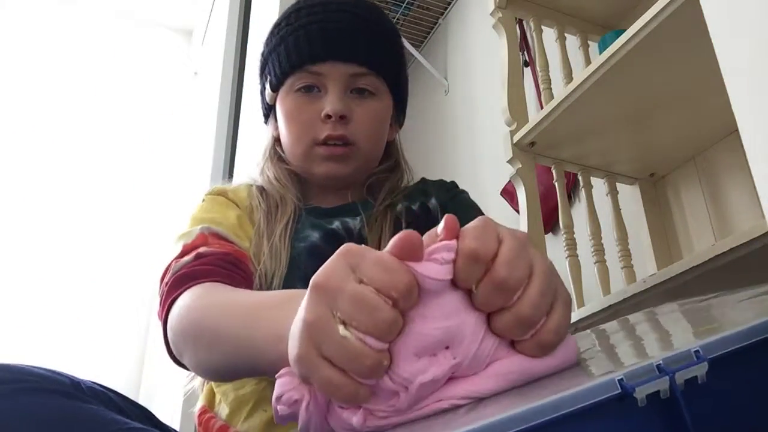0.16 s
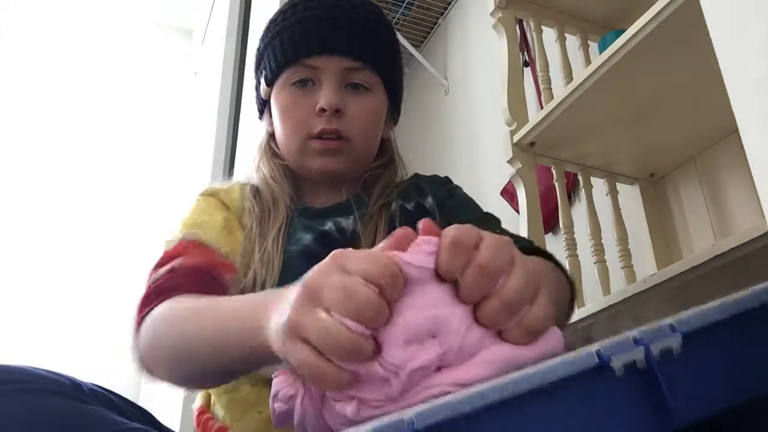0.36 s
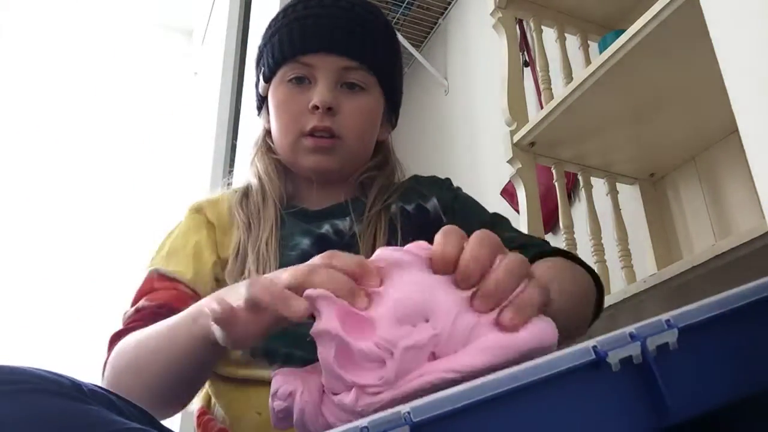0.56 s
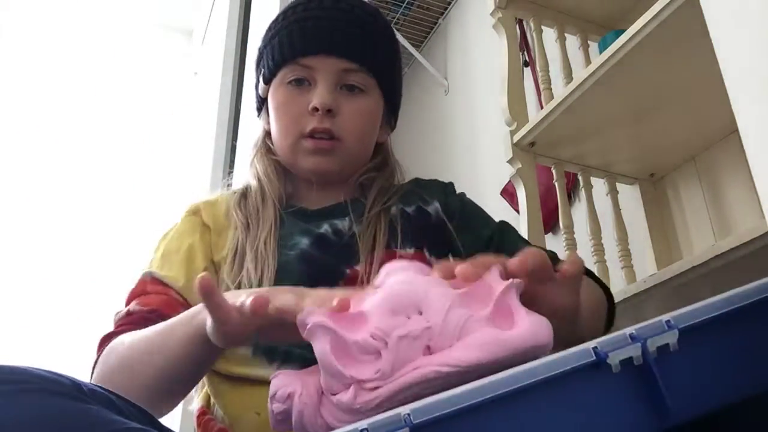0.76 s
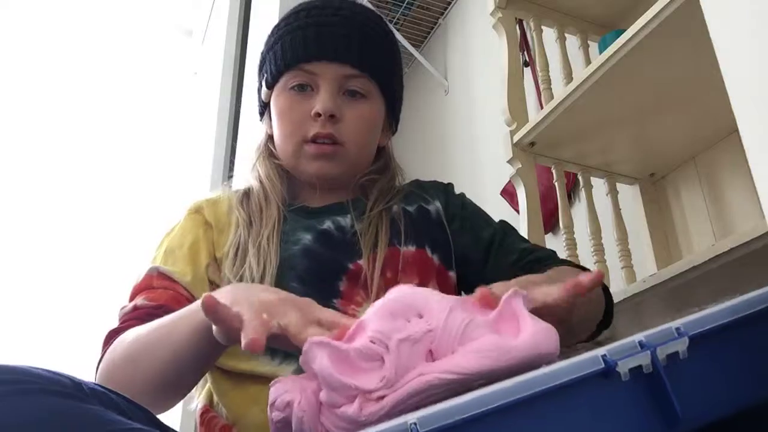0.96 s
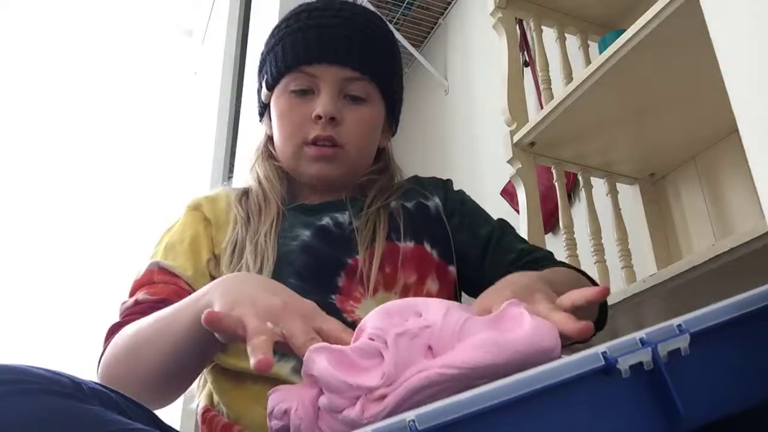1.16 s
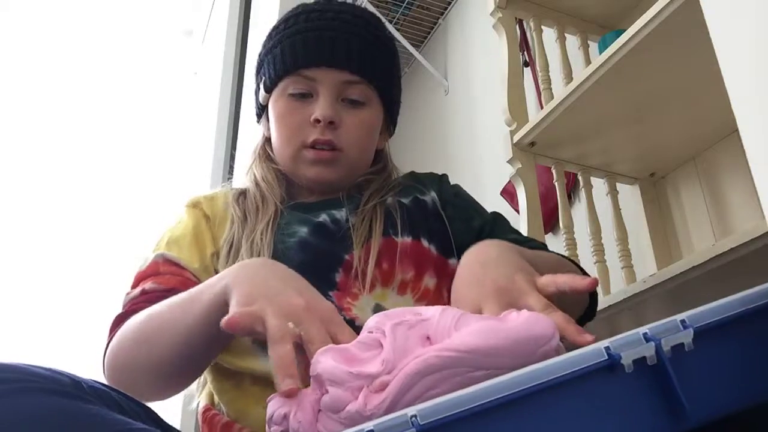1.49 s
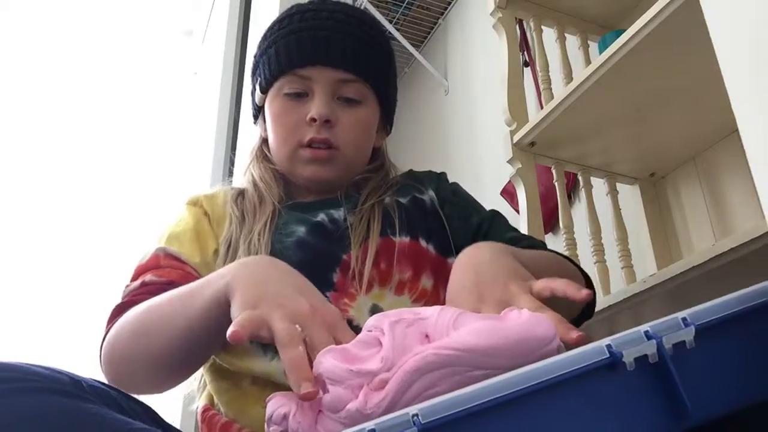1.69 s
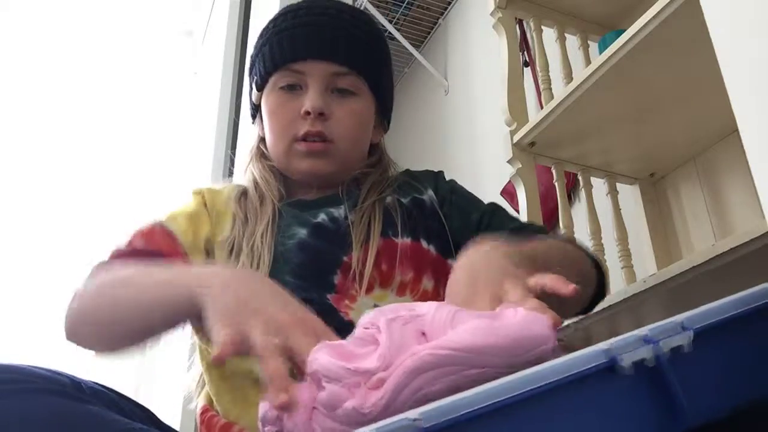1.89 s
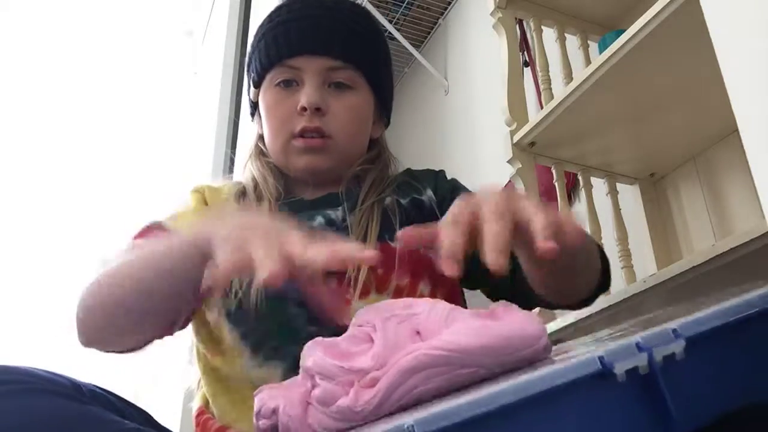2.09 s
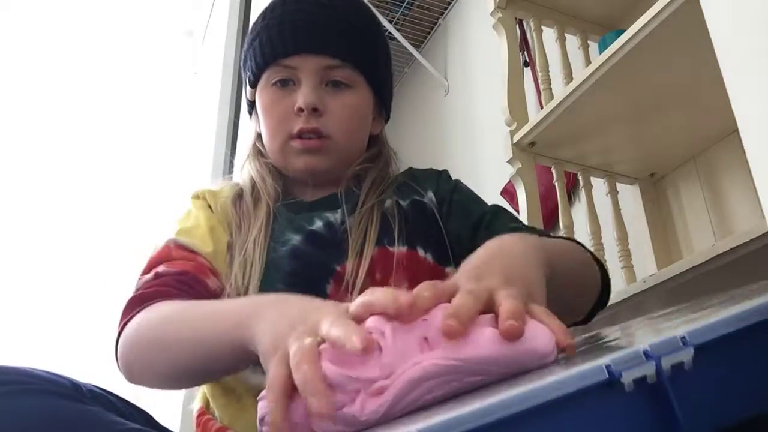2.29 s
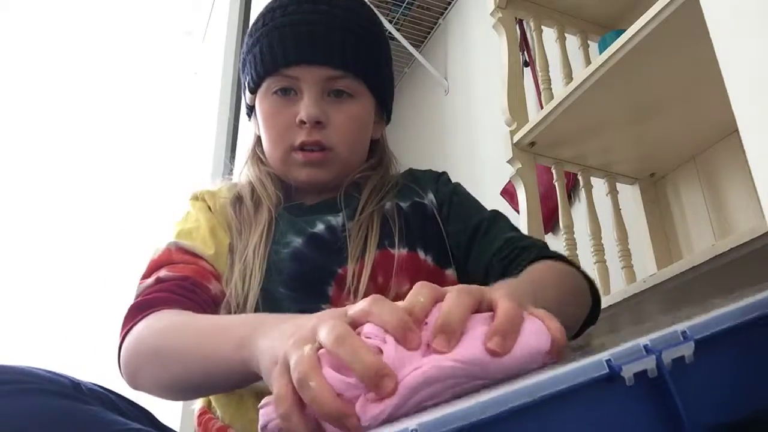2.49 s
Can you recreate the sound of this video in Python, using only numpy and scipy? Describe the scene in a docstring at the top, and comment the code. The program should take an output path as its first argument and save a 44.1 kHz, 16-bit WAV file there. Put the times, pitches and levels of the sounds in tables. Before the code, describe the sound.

Soft slime is kneaded by hand, close to the microphone in a small room. Tiny bubbles snap first, then air pockets plop among wet squishes. Near the end a plastic lid rumbles softly, over a steady low hum.

```python
"""Kneading slime on a plastic lid

Two hands work soft slime, close up in a small room. Tiny surface bubbles snap, trapped air plops
out among wet smacks and squishes, and the sticky skin peels away with a fine crackle.
Toward the end the lid rumbles as the hands lift and press down again; an appliance hums behind."""
import sys
import numpy as np
from scipy import signal
from scipy.fft import rfft, irfft, next_fast_len
from scipy.io import wavfile

SR = 44100
rng = np.random.default_rng(int(sys.argv[2]) if len(sys.argv) > 2 else 0)


def inscribe(sig):
    """Save sig as 16-bit PCM at rate SR to the path in sys.argv[1].

    A 1-D sig is mono; a 2-D sig holds one channel per row.
    Samples are clipped to [-1, 1] before scaling.
    """
    pcm = np.round(np.clip(np.atleast_2d(sig).T, -1, 1) * 32767)
    wavfile.write(sys.argv[1], SR, pcm.astype(np.int16))


N = 116865


def snaps():
    """A bubble film bursts: a few very high cycles over a small dull push."""
    # surface bubbles: (time [s], level before EQ [dB], pitch [Hz], push against ring [dB])
    bubbles = [(.0057, -43.5, 11700, -30), (.0849, -44, 10700, -28), (0.092, -40, 12800, -31.5),
               (0.108, -47, 11000, -30), (0.1225, -32, 13300, -38), (0.15, -8.5, 13320, -13.5),
               (.1632, -28, 12400, -25), (0.1838, -27.5, 12400, -34), (0.253, -53, 11100, -6.5),
               (.299, -52.5, 9700, 3), (.3412, -41, 14000, -1.5), (0.348, -24, 11550, -31),
               (0.5588, -60, 7840, 16), (.585, -62, 8000, 3), (.8761, -62, 14000, -16),
               (0.8914, -35.5, 11800, -8), (1.2205, -48.5, 13100, -20.5), (1.264, -43, 13600, 0),
               (1.3095, -53, 11700, -20), (1.504, -57.5, 8500, 13.5), (1.5432, -45, 8800, -32),
               (1.687, -59.5, 10000, -20), (1.699, -57.5, 5400, 13), (2.1328, -49.5, 5500, -12),
               (2.5666, -55.5, 6850, -15), (2.5751, -51, 13500, -3), (2.5894, -68, 8800, 2)]
    # EQ on the snaps: (frequency [Hz], gain [dB])
    colour = [(1200, 3.5), (2050, -3.5), (3100, 4.5), (4200, -2), (5300, 3), (7000, 0), (8500, 1.5),
              (12000, -3), (14500, 0), (16000, -4)]
    push_hz, low_cut_hz = 1500, 750
    out, t = np.zeros(N), np.arange(SR // 100) / SR
    for s, db, hz, push_db in bubbles:
        ring = np.sin(2 * np.pi * hz * t) * swell(t, rise=.00013, t60=.00045)
        push = np.cos(2 * np.pi * push_hz * t) * fade(t, t60=.0001)
        add(out, s, amp(db) * (ring + amp(push_db) * push))
    return filtered(out, lambda f: amp(along(colour, f)) * 1j * f / (1j * f + low_cut_hz))


def plops():
    """An air pocket rings briefly, its pitch sagging as the slime closes over it."""
    # pockets squeezed out:
    # (time [s], level [dB], starting pitch [Hz], t60 [s], sag [share of pitch], overtone [dB])
    pockets = [(.2705, -37.5, 436, 0.036, 0.43, -12.5), (.278, -43, 259, 0.044, 0.064, -20),
               (0.5256, -33, 319, .036, .25, -17.5), (.58, -51, 360, .033, 0.09, -13),
               (.638, -48, 354, 0.073, 0.062, -18), (.745, -52, 391, 0.042, .1, -12),
               (1.029, -40, 189, 0.018, 0.061, -6), (1.076, -37, 174.4, 0.047, .05, -11),
               (1.085, -40.5, 452, 0.03, 0.17, -19.5), (1.4406, -28.5, 190, 0.021, 0.12, -13),
               (1.4496, -29, 380, 0.032, .3, -33), (1.4505, -41.5, 652, 0.027, .15, -23),
               (1.522, -55, 403, 0.022, .1, -12), (1.6515, -40, 615, 0.013, 0.11, -7),
               (1.652, -25, 214, 0.044, 0.083, -4.5), (2.101, -36.5, 246, 0.057, .1, -20),
               (2.107, -30.5, 554, 0.048, 0.068, -30), (2.109, -26, 381, 0.02, 0.24, -34),
               (2.1323, -35, 670, 0.0083, 0.25, -14), (2.182, -33.5, 222, 0.034, 0.05, -11),
               (2.314, -32.5, 199, 0.025, 0.13, -10), (2.386, -35, 210.5, 0.034, .15, -4.5),
               (2.405, -40, 452, 0.033, 0.23, -24), (2.604, -54, 400, 0.046, .1, -23)]
    rise_cycles, sag_s, overtone_ratio = .59, .016, 1.897
    out, t = np.zeros(N), np.arange(SR // 10) / SR
    for s, db, hz, t60, sag, overtone_db in pockets:
        pitch = hz * (1 - sag * (1 - np.exp(-t / sag_s)))
        phase = 2 * np.pi * np.cumsum(pitch) / SR
        note = np.sin(phase) + amp(overtone_db) * np.sin(overtone_ratio * phase)
        add(out, s, amp(db) * note * swell(t, rise_cycles / hz, t60) / np.sqrt(2))
    return out


def smacks():
    """Wet surfaces part: a short hollow note with a little splash around its pitch."""
    # lips of slime opening over a pocket: (time [s], level [dB], pitch [Hz], t60 [s], overtone [dB])
    partings = [(0.2713, -55.5, 1480, 0.013, -13), (.2715, -57, 777, 0.024, -40),
                (.527, -58, 890, 0.012, -17), (1.0745, -56, 680, 0.029, -22.5),
                (1.087, -66.5, 1510, 0.017, -7.5), (1.4502, -52, 1090, 0.0061, -5),
                (1.522, -60.5, 1290, 0.0071, -13), (1.65, -43, 1430, 0.011, -39),
                (1.661, -62, 1600, .022, -30), (2.097, -61.5, 840, 0.012, -1.5),
                (2.11, -53, 1040, 0.01, -13), (2.1326, -47, 1206, 0.0083, -19),
                (2.3851, -60.5, 1430, 0.029, -9), (2.3858, -55.5, 790, 0.02, -28),
                (2.404, -62.5, 1520, 0.015, -18)]
    overtone_ratio, splash_db = 2.05, -10.5
    out, t = np.zeros(N), np.arange(SR // 20) / SR
    for s, db, hz, t60, overtone_db in partings:
        phase = 2 * np.pi * hz * t
        note = np.sin(phase) + amp(overtone_db) * np.sin(overtone_ratio * phase)
        splash = amp(splash_db) * band(len(t), hz, width=.5)
        add(out, s, amp(db) * (note + splash) * swell(t, rise=.00098, t60=t60))
    return out


def peeling():
    """Skin rubs off the slime with a soft hiss while tiny threads let go in clumps."""
    # envelope of the peel: (time [s], level [dB])
    envelope = [(0, -75), (.05, -76.5), (.11, -79), (.14, -67), (.48, -91), (.52, -70), (.58, -65.5),
                (.62, -69), (.69, -67.5), (.72, -62), (.8, -66), (.84, -78), (.885, -67.5), (.92, -75),
                (1.03, -84), (1.21, -92.5), (1.225, -77), (1.33, -80.5), (1.42, -77.5), (1.52, -75),
                (1.62, -86), (1.755, -88), (1.77, -74.5), (1.82, -93), (2.07, -83), (2.135, -62),
                (2.2, -81), (2.54, -83.5), (2.58, -75), (2.65, -76)]
    # tone of the crackle and hiss: (frequency [Hz], relative level [dB])
    colour = [(300, 0.5), (1000, -4.5), (2200, -7), (5000, -5.5), (9000, -8.5), (12000, -6), (14700, -1.5),
              (16000, -9.5)]
    ticks_per_s, spread_db, rub_db = 1600, 4.5, -4
    clumps_per_s, clump_db = 200, 2.5
    ticks = (rng.random(N) < ticks_per_s / SR) * rng.choice([-1, 1], N)
    ticks = ticks * amp(spread_db * rng.standard_normal(N))
    clump_index = np.arange(N) * clumps_per_s / SR
    clumps = amp(clump_db * np.interp(clump_index, np.arange(N), rng.standard_normal(N)))
    rub = amp(rub_db) * rng.standard_normal(N)
    return coloured(clumps * (unit(ticks) + rub), colour) * level(envelope)


def squishes():
    """Short bands of hiss: soft squishes, the fizz after the loud snap, and a tick's brief ring."""
    # bands of hiss: (peak time [s], length [s], level [dB], pitch [Hz], width [share of pitch])
    hisses = [(0.178, 0.031, -57.5, 12800, .25), (0.517, 0.02, -72, 4620, .28),
              (0.585, .008, -67.5, 5300, .84), (0.737, 0.08, -64, 13600, 0.49),
              (0.885, 0.017, -68, 4500, .4), (1.548, .005, -67, 8230, 0.073),
              (2.087, 0.039, -74.5, 4190, .12), (2.154, 0.028, -62.5, 790, 1.16),
              (2.354, 0.098, -81.5, 4170, 0.15), (2.629, 0.0046, -68, 2750, .21),
              (2.61, 0.12, -76.5, 1000, 1)]
    out, t = np.zeros(N), np.arange(N) / SR
    for s, length, db, hz, width in hisses:
        envelope = np.exp(-2 * ((t - s) / length) ** 2)
        out += amp(db) * band(N, hz, width) * envelope
    return out


def lid():
    """The hands shake the low modes of the lid and give it a few soft pushes."""
    # resonances of the plastic: (frequency [Hz], width [Hz], relative level [dB])
    modes = [(75.3, 35, -0.5), (120, 19, -3), (235.5, 66, -5.5), (328.8, 20, -6.5)]
    # envelope of the rumble: (time [s], level [dB])
    envelope = [(1.86, -66), (1.91, -58), (1.96, -54), (2.0, -44), (2.09, -43.5), (2.17, -46),
                (2.27, -51.5), (2.38, -49.5), (2.47, -52.5), (2.55, -80), (2.65, -51.5)]
    # hands pressing down: (time [s], level [dB])
    pushes = [(1.905, -37.5), (1.988, -37), (2.063, -53), (2.081, -47)]

    def body(f):
        return sum(amp(db) * np.abs(resonance(f, hz, 2 * width)) ** 3 for hz, width, db in modes)

    out = unit(filtered(rng.standard_normal(N), body)) * level(envelope)
    thud_hz, t = 89.4, np.arange(SR // 5) / SR
    thud = np.sin(2 * np.pi * thud_hz * t) * swell(t, rise=.0046, t60=.13)
    for s, db in pushes:
        add(out, s, amp(db) * thud)
    return out


def nearby(x):
    """Scatter off hands and lid, and smeared echoes from shelf and walls."""
    # early reflections: (delay [s], level [dB])
    echoes = [(.0042, -15), (0.013, -26.5)]
    scatter_db, t = -13.5, np.arange(SR // 10) / SR
    response = rng.standard_normal(len(t)) * fade(t, t60=.024)
    response *= amp(scatter_db) / np.linalg.norm(response)
    for s, db in echoes:
        smear = rng.standard_normal(len(t)) * fade(t, t60=.0043)
        add(response, s, amp(db) * smear / np.linalg.norm(smear))
    return signal.fftconvolve(x, response)[:N]


def room(x, wet_db):
    """Diffuse tail of the small room, each band dying at its own rate."""
    # reverb time: (frequency [Hz], t60 [s])
    decay = [(150, .21), (1000, .1), (7000, 0.19), (14000, 0.05)]
    hz, t, noise = signal.stft(rng.standard_normal(SR // 2), SR, nperseg=256)
    tail = signal.istft(noise * fade(t, along(decay, hz)[:, None]), SR, nperseg=256)[1]
    return amp(wet_db) * signal.fftconvolve(x, tail / np.linalg.norm(tail))[:N]


def background():
    """An appliance's steady hum over the room's rumble and hiss."""
    # tones of the hum: (frequency [Hz], rms level [dB])
    tones = [(69, -69), (84, -58.5), (105, -64), (120, -58.5)]
    # room tone: (frequency [Hz], relative level [dB])
    room_tone = [(20, -58), (33, -17.5), (42, -2), (65, 2), (135, -1.5), (200, -5), (290, -6.5), (380, -23),
                 (500, -23), (800, -29.5), (2000, -33), (6000, -40.5), (9000, -40.5), (14500, -45),
                 (16000, -49.5)]
    room_tone_db, t = -59.5, np.arange(N) / SR
    hum = sum(amp(db) * np.sqrt(2) * np.sin(2 * np.pi * (hz * t + rng.random())) for hz, db in tones)
    return hum + amp(room_tone_db) * coloured(rng.standard_normal(N), room_tone)


def amp(db):
    """Decibels to gain."""
    return 10 ** (np.asarray(db) / 20)


def unit(x):
    """Scale to rms 1."""
    return x / np.sqrt(np.mean(x ** 2) + 1e-20)


def along(points, hz):
    """Read (Hz, value) points on a log axis."""
    f, v = np.transpose(points)
    return np.interp(np.log(hz + 1), np.log(f + 1), v)


def level(points):
    """Gain per sample from (s, dB) points."""
    return amp(np.interp(np.arange(N) / SR, *np.transpose(points)))


def filtered(x, response):
    """Apply a frequency response."""
    size = next_fast_len(len(x) + 8192)
    return irfft(rfft(x, size) * response(np.fft.rfftfreq(size, 1 / SR)), size)[:len(x)]


def coloured(x, spectrum):
    """EQ x with (Hz, dB) points and scale to rms 1."""
    return unit(filtered(x, lambda hz: amp(along(spectrum, hz))))


def resonance(f, hz, width):
    """Response of one damped resonance."""
    return 1j * f * width / (hz * hz - f * f + 1j * f * width)


def band(size, hz, width):
    """Noise of rms 1, passed twice through a resonance whose width is a share of its pitch."""
    return unit(filtered(rng.standard_normal(size), lambda f: resonance(f, hz, width * hz) ** 2))


def fade(t, t60):
    """Exponential decay, 60 dB down after t60 seconds."""
    return np.exp(-np.log(1000) * t / t60)


def swell(t, rise, t60):
    """Soft attack and exponential decay, peak 1; times in seconds."""
    shape = fade(t, t60) * (1 - np.exp(-(t / rise) ** 2))
    return shape / shape.max()


def add(track, s, sound):
    """Mix a sound into the track at s seconds."""
    part = track[max(round(s * SR), 0):][:len(sound)]
    part += sound[:len(part)]


def scene():
    """Mono mix: snaps, plops and smacks ring in the room; the other layers stay dry."""
    clicks, pockets = snaps(), plops() + smacks()
    clicks = clicks + nearby(clicks) + room(clicks, wet_db=-11.5)
    pockets = pockets + room(pockets, wet_db=-9.5)
    slime = clicks + pockets + peeling() + squishes()
    return (slime + lid() + background())[None]


def record(dry):
    """Cut the deepest bass and roll the very top off steeply."""
    low_cut_hz, top_hz = 36, 16000
    x = signal.sosfilt(signal.butter(4, low_cut_hz, "high", fs=SR, output="sos"), dry[0])
    return filtered(x, lambda hz: 1 / np.sqrt(1 + (hz / top_hz) ** 120))[None]


dry = scene()
out = record(dry)
inscribe(out)
```